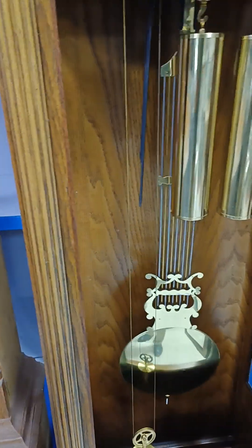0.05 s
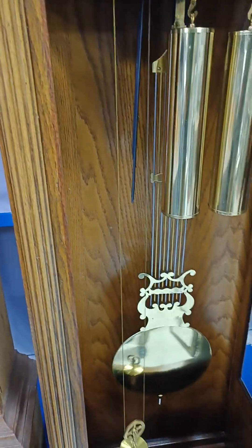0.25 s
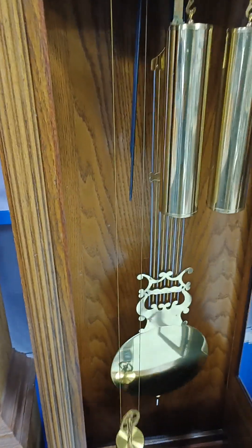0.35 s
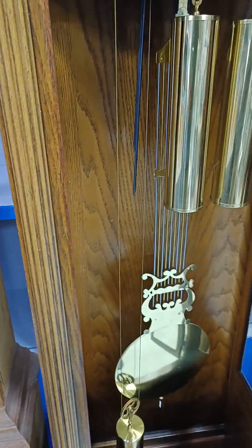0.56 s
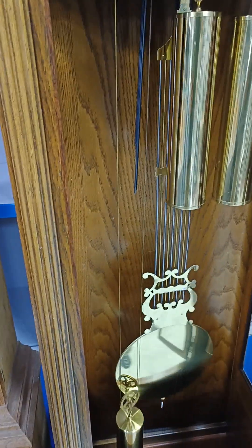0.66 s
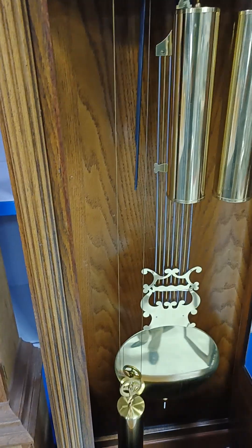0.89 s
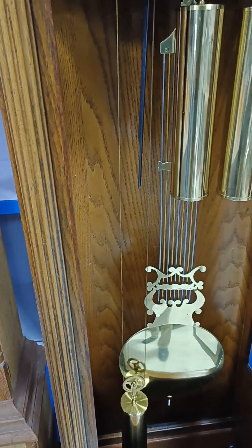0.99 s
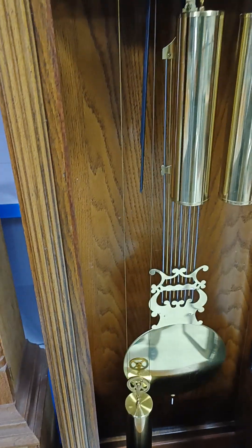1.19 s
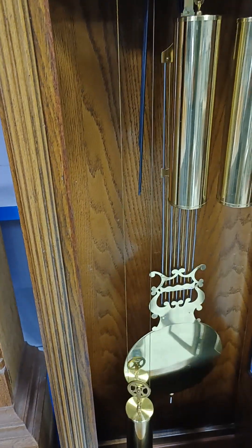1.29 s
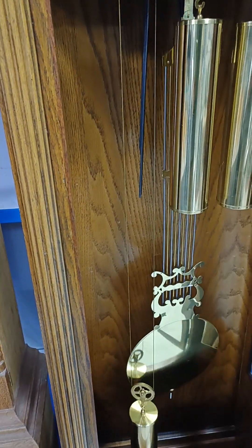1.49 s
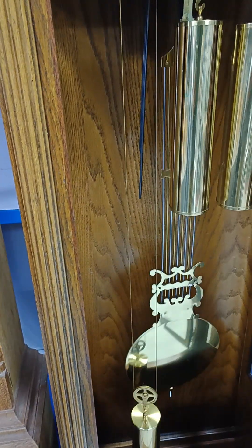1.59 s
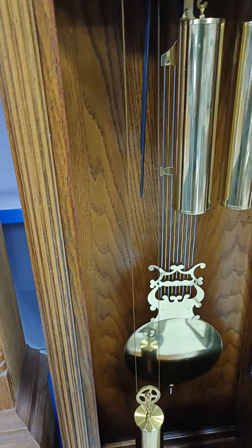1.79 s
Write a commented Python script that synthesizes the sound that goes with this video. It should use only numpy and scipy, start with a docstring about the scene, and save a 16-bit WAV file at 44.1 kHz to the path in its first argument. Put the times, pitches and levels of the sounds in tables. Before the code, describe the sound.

Uneven ratchet clicks of a tall clock being wound, with a booming knock and lighter tock.

```python
"""The ratchet of a long-case pendulum clock being wound, on a stereo pair close inside the wooden case.
The pawl drops from tooth to tooth, clicking unevenly as a weight rises. A heavy knock booms through
the case and sets brass parts rattling; a lighter tock rings a wooden panel later on.
Room air and a faint low hum lie underneath."""
import sys
import numpy as np
from scipy import signal
from scipy.fft import rfft, irfft, next_fast_len
from scipy.io import wavfile

SR = 44100
rng = np.random.default_rng(int(sys.argv[2]) if len(sys.argv) > 2 else 0)


def transcribe(signal):
    """Save signal, clipped to [-1, 1], as a 16-bit WAV file at the path in sys.argv[1]."""
    frames = np.atleast_2d(signal).T
    limited = np.clip(frames, -1, 1)
    pcm = np.round(limited * 32767).astype(np.int16)
    wavfile.write(sys.argv[1], SR, pcm)


N = 81585
TIME = np.arange(N) / SR
BINS = np.maximum(np.fft.rfftfreq(N, 1 / SR), 1)


def amp(db):
    """Decibels to gain."""
    return 10 ** (np.asarray(db) / 20)


def at_hz(points, hz, column=1):
    """Read a column of a table on a log-frequency axis."""
    table = np.array(points, float)
    return np.interp(np.log(hz), np.log(table[:, 0]), table[:, column])


def likeness(hz):
    """Correlation of the two microphones: high in the bass, low in the treble."""
    # stereo width: (frequency [Hz], side against mid [dB])
    side_level = [(100, -24), (190, -26), (300, -15), (450, -6), (800, -1), (2000, -3.5), (6000, -2.5),
                  (15000, -1)]
    side = amp(at_hz(side_level, hz)) ** 2
    return (1 - side) / (1 + side)


def noise(colour):
    """Stereo noise of a given colour, centred in the bass and wider in the treble."""
    alike = likeness(BINS)
    mid, side = rfft(rng.standard_normal((2, N)))
    pair = np.sqrt((1 + alike) / 2) * mid + np.sqrt((1 - alike) / 2) * side * [[1], [-1]]
    return irfft(pair * amp(at_hz(colour, BINS)), N)


def tone(hz, jostle=0):
    """A stereo sine; high ones reach the two microphones out of step."""
    phase, offset = rng.uniform(-np.pi, np.pi, 2)
    apart = np.arccos(likeness(hz)) * np.sign(offset)
    return np.sin(2 * np.pi * hz * TIME + phase + jostle + np.array([[0], [apart]]))


def wavering(hz, width):
    """A narrow band of noise, rms 1."""
    band = irfft(rfft(rng.standard_normal(N)) / (1 + ((BINS - hz) / width) ** 2), N)
    return band / band.std()


def envelope(start, rise, t60, hold=0):
    """A straight rise, a hold and an exponential decay, all in seconds."""
    age = TIME - start
    attack = np.clip(age / max(rise, 1e-4), 0, 1)
    return attack * np.exp(-np.log(1000) * np.maximum(age - rise - hold, 0) / t60)


def ring(start, hz, db, rise, t60):
    """One struck mode."""
    return amp(db) * envelope(start, rise, t60) * tone(hz)


def strikes(times, dbs):
    """Impulses at the given times."""
    out = np.zeros(N)
    np.add.at(out, np.clip((np.asarray(times) * SR).astype(int), 0, N - 1), amp(dbs))
    return out


def background():
    """Room air, a wavering low hum and a faint rumble fill the case."""
    # room air: (frequency [Hz], level [dB])
    air = [(25, -50), (45, -22.5), (75, -22), (120, -38), (185, -18.5), (250, -26.5), (330, -35.5),
           (500, -35.5), (900, -45), (1500, -39), (2400, -45), (4000, -51.5), (6400, -54), (9000, -57),
           (15000, -62.5)]
    # bands of the hum: (centre [Hz], level [dB], width [Hz])
    hum_bands = [(95, -60, 42), (175.6, -58, 14), (329.2, -60, 8.9)]
    # the rumble swells and sinks: (time [s], level [dB])
    rumble_level = [(0, -61), (.16, -45), (.7, -49.5), (1.0, -54.5), (1.4, -62), (1.85, -47.5)]
    hum = sum(amp(db) * wavering(hz, width) for hz, db, width in hum_bands)
    rumble = amp(np.interp(TIME, *np.transpose(rumble_level))) * wavering(hz=69, width=20.4)
    return amp(-5.5) * noise(air) + hum + rumble


def tock(start=1.0648):
    """A light, hard blow cracks on a wooden panel and rings it."""
    # panel modes: (frequency [Hz], level [dB], rise [s], t60 [s])
    panel_modes = [(160, -38, .005, 0.31), (265, -37, 0.0043, 0.14), (300, -23, 0.0017, 0.16),
                   (342, -19, 0.0079, 0.22), (400, -41, .004, 0.2), (702.4, -28.5, 0.0022, .17),
                   (841.7, -25.5, 0.0012, 0.13), (1284, -43, .001, 0.18), (1516, -38, .001, 0.18),
                   (1787, -39, .001, .14), (1920, -43, .001, 0.099), (2068, -31.5, .001, 0.14),
                   (2370, -34.5, .001, 0.13)]
    # the blow, and its decay in the room: (frequency [Hz], level [dB])
    blow_colour = [(200, -25), (300, -22), (500, -15), (750, -28), (1100, -13), (1500, -15.5),
                   (2200, -19.5), (3200, -26.5), (6000, -34), (15000, -40.5)]
    room_colour = [(200, -30.5), (340, -12.5), (500, -46), (750, -24.5), (1500, -31.5), (2400, -33.5),
                   (4000, -47), (15000, -85)]
    panel = sum(ring(start, *mode) for mode in panel_modes)
    clatter = amp(2) * noise(blow_colour) * envelope(start, rise=0.00076, t60=0.1)
    crack = ring(start, hz=2230, db=-20, rise=0.0015, t60=0.0082)
    room = noise(room_colour) * envelope(start, rise=0.013, t60=0.72)
    return panel + crack + clatter + room


def knock(start=0.2285):
    """A soft heavy blow: the case's low modes swell and boom, and the room carries them on."""
    # case modes: (frequency [Hz], level [dB], rise [s], t60 [s])
    case_modes = [(73.97, -21.5, 0.05, 0.24), (97.4, -23, 0.021, 0.1), (147.9, -20, 0.023, 0.31),
                  (181.9, -5, 0.02, .25), (225.8, -23, 0.041, 0.38), (275, -25, 0.022, 0.17),
                  (311.2, -17.5, .015, 0.11), (392.2, -25.5, 0.0091, 0.25), (424.4, -20, 0.0089, 0.11),
                  (490, -23, 0.0047, 0.13), (625, -32, 0.0034, 0.12), (929, -30, 0.0045, 0.26),
                  (1003, -29.5, 0.0061, 0.25), (1774, -26, 0.0027, 0.15)]
    # the blow, and its decay in the room: (frequency [Hz], level [dB])
    blow_colour = [(100, -22), (300, -14), (430, -0.5), (600, -12), (900, -13), (1400, -10), (2500, -20.5),
                   (4000, -22.5), (8000, -33), (15000, -43)]
    room_colour = [(40, -11), (75, -2.5), (120, -11.5), (185, -5), (330, -8.5), (500, -20.5), (900, -19),
                   (1500, -30.5), (2800, -29.5), (6000, -44), (15000, -44)]
    boom = sum(ring(start, *mode) for mode in case_modes)
    thud = amp(-3.5) * noise(blow_colour) * envelope(start, rise=0.0073, t60=0.14, hold=0.013)
    room = noise(room_colour) * envelope(start, rise=0.023, t60=0.76)
    return boom + thud + room


def rattle():
    """Loose brass parts buzz against each other in short bursts; each favours one part's ring."""
    # parts touch: (time [s], level [dB], rise [s], hold [s], t60 [s], favoured ring [Hz])
    touches = [(0.149, -16.5, 0.0012, 0.0053, 0.11, 2740), (0.169, -18.5, 0.0018, 0.0056, 0.21, 6500),
               (0.234, 3, 0.0042, 0.0044, 0.028, 6200), (0.244, -2, 0.0026, 0.0013, 0.039, 2840),
               (0.2673, 1, 0.0026, 0.0053, 0.055, 2780), (0.303, -5, 0.0024, .004, 0.04, 2680),
               (0.342, -9.5, .003, 0.0067, 0.059, 2130), (0.353, -12, .003, 0.0045, 0.066, 6530),
               (1.033, -18, .002, .004, 0.37, 2400), (1.16, -24.5, 0.0028, 0.0059, 0.05, 6300),
               (1.273, -19, 0.0056, 0.0058, 0.11, 2250)]
    # the brass's modes, and the hiss of contact: (frequency [Hz], level [dB])
    brass_modes = [(2180, -37), (2398, -36.5), (2573, -38.5), (2808, -35), (3006, -46), (3068, -32.5),
                   (6030, -41.5), (6250, -47.5), (6480, -49), (8450, -48), (11300, -47), (12600, -39.5),
                   (15300, -30)]
    hiss_colour = [(1000.0, -28), (1700.0, -22.5), (2300.0, -14.5), (2850.0, -9.5), (3800.0, -25),
                   (5000.0, -23), (6300.0, -24.5), (8000.0, -27.5), (11000.0, -26), (13500.0, -36.0),
                   (15300.0, -22)]
    focus_db, focus_octaves = 9.5, 0.089
    blur = 0.0051  # repeated touches jostle each ring's phase, at this share of its pitch
    hz, level = np.transpose(brass_modes)
    tones = np.array([tone(f, jostle=wavering(0, blur * f)) for f in hz])
    metal, buzz_power = 0, 0
    for start, db, rise, hold, t60, focus_hz in touches:
        burst = amp(db) * envelope(start, rise, t60, hold)
        after_ring = amp(db - 21.5) * envelope(start, rise, t60=0.3)
        focus = np.exp(-(np.log2(hz / focus_hz) / focus_octaves) ** 2)
        weights = amp(level + focus_db * focus) * rng.choice([-1, 1], len(hz))
        metal += (burst + after_ring) * np.tensordot(weights, tones, 1)
        buzz_power += burst ** 2
    return amp(-5) * noise(hiss_colour) * np.sqrt(buzz_power) + metal


def pawl_ring(landings, levels):
    """The steel rings after each drop until the next, with its own strength and pitch for every tooth."""
    # modes of pawl and wheel: (frequency [Hz], level [dB], t60 [s])
    steel_modes = [(963, -47, 0.11), (2190, -53.5, 0.18), (2523, -53, 0.12), (3418, -50.5, 0.09),
                   (5350, -45.5, 0.065), (5990, -54.5, 0.1), (6460, -53, 0.097), (8010, -52.5, 0.13),
                   (11600, -48, 0.052)]
    spread_db, pitch_spread = 2.5, 0.015
    tooth = np.maximum(np.searchsorted(landings, TIME) - 1, 0)
    age = np.maximum(TIME - landings[tooth], 0)
    out = 0
    for hz, db, t60 in steel_modes:
        strength, detune, *mic_phases = rng.standard_normal((len(levels), 4)).T
        height = amp(db + levels + spread_db * strength)[tooth] * amp(-60 * age / t60)
        pitch = hz * (1 + pitch_spread * detune[tooth])
        out += height * np.sin(2 * np.pi * pitch * age + np.array(mic_phases)[:, tooth])
    return out


def pawl_snap(landings, levels):
    """The pawl lands and bounces, each contact a bright tick."""
    # contacts of one drop: (base delay [s], level [dB])
    bounces = [(.001, 9), (.0047, -11), (.014, -11)]
    contacts = sum(strikes(landings + delay * rng.uniform(0.77, 3.4, len(landings)), levels + db)
                   for delay, db in bounces)
    treble = signal.butter(2, [4000, 7500], "band", fs=SR, output="sos")
    return amp(-29.5) * signal.sosfilt(treble, contacts)


def ratchet():
    """Close to the microphones, each drop of the pawl snaps, rings and scatters through the case."""
    # the pawl drops off a tooth: (time [s], level [dB], rise [s])
    clicks = [(-0.004, 0, .001), (0.053, 0.5, .001), (0.1233, -1.5, .001), (0.191, -2, .002),
              (0.336, -1.5, .001), (0.3925, -3, .001), (0.437, -2, .001), (0.4762, -2.5, .001),
              (0.521, -1.5, .001), (0.6266, 1, .001), (0.7275, 0, .001), (0.7893, -0.5, .001),
              (0.8456, -1, .001), (0.9014, -0.5, .001), (0.9578, 0.5, 0.0013), (1.0135, 1.5, .001),
              (1.1216, -1.5, .001), (1.1918, 0.5, .001), (1.275, -0.5, .009), (1.3626, 2, .001),
              (1.4441, -0.5, .001), (1.530, -1, .001), (1.620, 0, .001), (1.6923, 0.5, .001),
              (1.7475, -1.5, .001), (1.8008, 1, .001)]
    # the click, and its decay in the case: (frequency [Hz], level [dB])
    click_colour = [(500.0, -44.5), (700.0, -37.0), (1000.0, -40), (1400.0, -40.5), (2400.0, -37),
                    (4200.0, -41), (6400.0, -41), (10000.0, -43.0), (15000.0, -40)]
    tail_colour = [(500, -53), (1000, -42.5), (2400, -56.5), (4200, -52), (6400, -67.5), (10000, -67),
                   (15000, -66)]
    hold_s, t60_s = 0.0059, 0.082
    shared = 0.81  # share of the case's answer that every click has in common
    times, levels, rises = np.transpose(clicks)
    landings = times + rises - rises.min()
    answer = noise(click_colour) * envelope(0, rises.min(), t60_s, hold_s)
    common = signal.fftconvolve(strikes(landings, levels)[None], answer, axes=1)[:, :N]
    scatter_power = sum((amp(db) * envelope(t, rise, t60_s, hold_s)) ** 2 for t, db, rise in clicks)
    scatter = noise(click_colour) * np.sqrt(scatter_power)
    body = np.sqrt(shared) * common + np.sqrt(1 - shared) * scatter
    snap = pawl_snap(landings, levels)
    tail_power = sum((amp(db) * envelope(t, rise=0.024, t60=0.28)) ** 2 for t, db, _ in clicks)
    tail = noise(tail_colour) * np.sqrt(tail_power)
    return amp(1.5) * body + tail + pawl_ring(landings, levels) + snap


def scene():
    """Everything heard from inside the case."""
    return ratchet() + rattle() + knock() + tock() + background()


def record(dry):
    """Two close microphones colour the sound; peaks are rounded, deep bass and top are cut."""
    # microphone colour: (frequency [Hz], left [dB], right [dB])
    mic_colour = [(395, 2, 2), (680, 2.5, 6.5), (926, -4, 3.0), (1480, 0, -2), (2340, -2.5, 6.0),
                  (3460, -1, 3.5), (4250, 3, 5.5), (5300.0, -2, 9), (6510, -1.5, 15.5), (7500, 2.5, 4.0),
                  (8400, 5.5, -18), (9320, 2, -12), (10780, 7, 0.5), (12300, 3, -8.5), (12900, -4.5, -16),
                  (14100, -1.0, 0.5), (15400.0, -11, -3.5)]
    # the treble reaches the left microphone first: (frequency [Hz], lead [s])
    left_lead = [(400, 0), (1500, .00034)]
    bass_cut_hz, top_cut_hz = 44, 15900
    ceiling, knee = 0.9, 6
    size = next_fast_len(N + 4096)
    hz = np.maximum(np.fft.rfftfreq(size, 1 / SR), 1)
    dry = signal.sosfilt(signal.butter(4, bass_cut_hz, "high", fs=SR, output="sos"), dry)
    colour = amp([at_hz(mic_colour, hz, column=1), at_hz(mic_colour, hz, column=2)])
    lag = np.exp(1j * np.pi * hz * at_hz(left_lead, hz) * np.array([[1], [-1]]))
    heard = irfft(rfft(dry, size) * colour * lag, size)
    rounded = heard / (1.5 + np.abs(heard / ceiling) ** knee) ** (1 / knee)
    low_pass = 1 / np.sqrt(1 + (hz / top_cut_hz) ** 200)
    return irfft(rfft(rounded) * low_pass, size)[:, :N]


dry = scene()
out = record(dry)
transcribe(out)
```